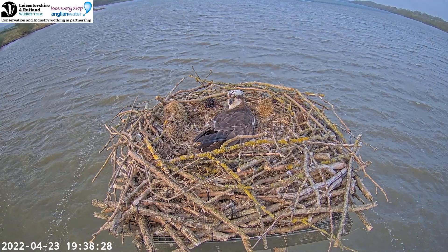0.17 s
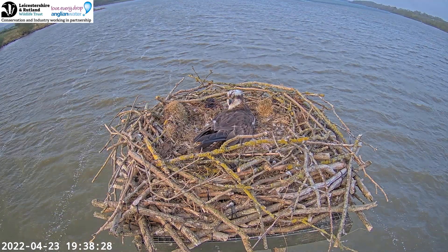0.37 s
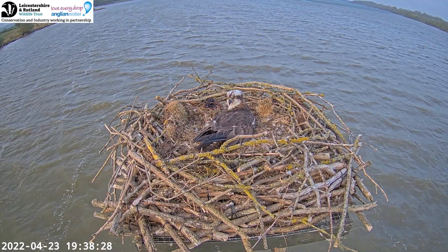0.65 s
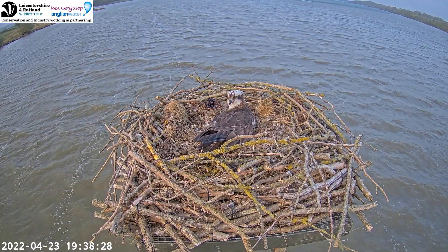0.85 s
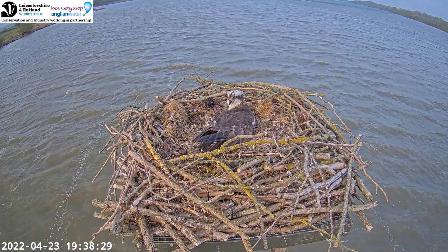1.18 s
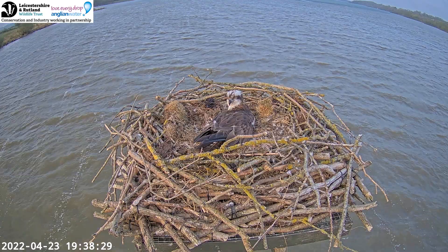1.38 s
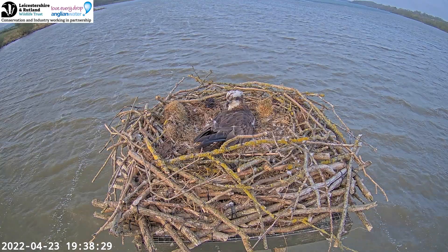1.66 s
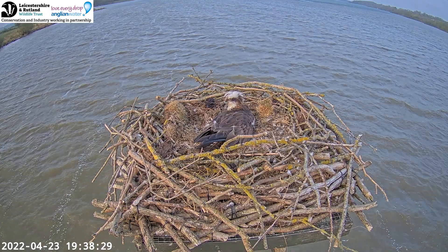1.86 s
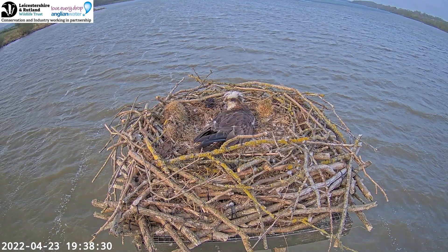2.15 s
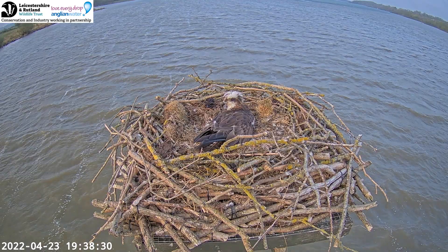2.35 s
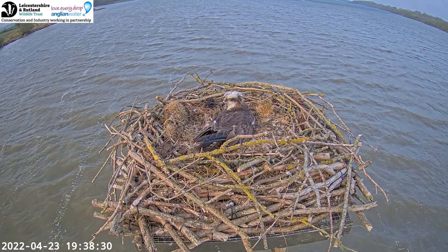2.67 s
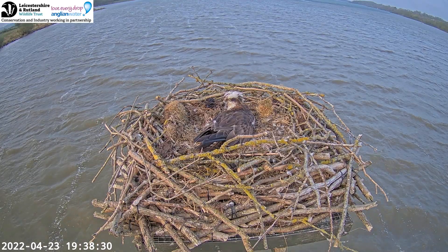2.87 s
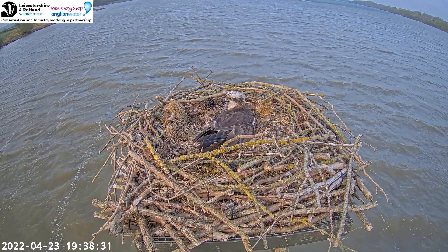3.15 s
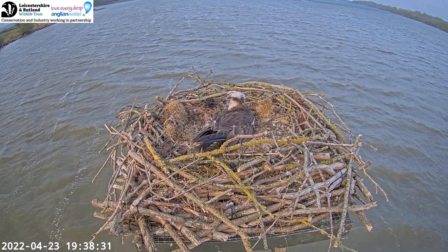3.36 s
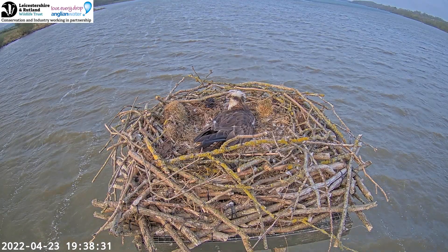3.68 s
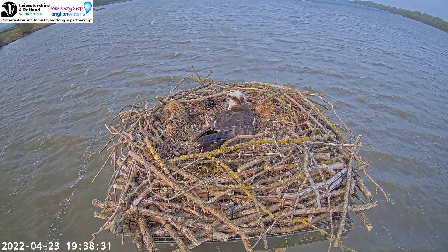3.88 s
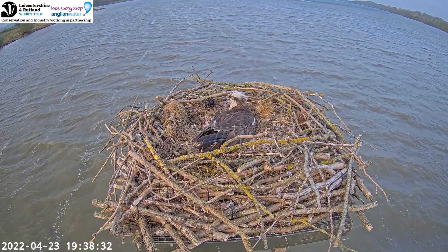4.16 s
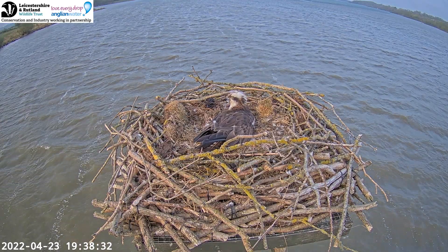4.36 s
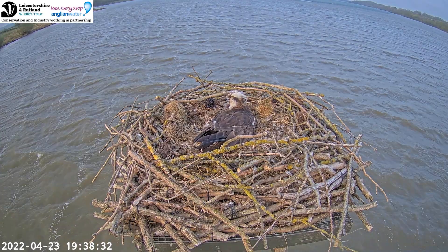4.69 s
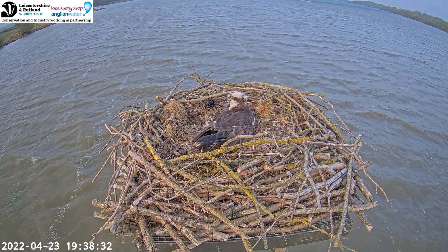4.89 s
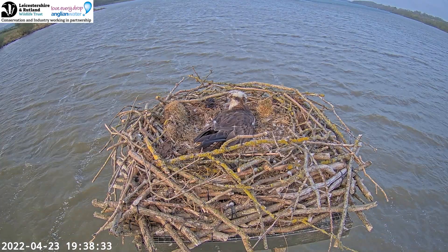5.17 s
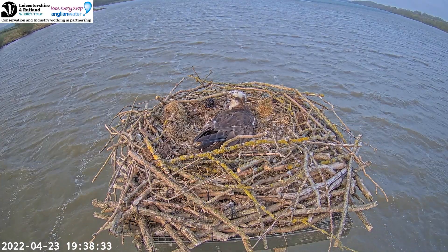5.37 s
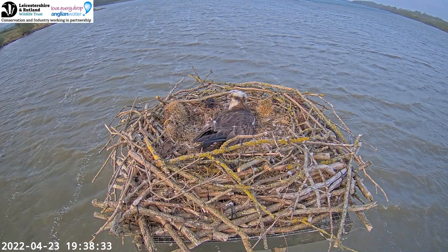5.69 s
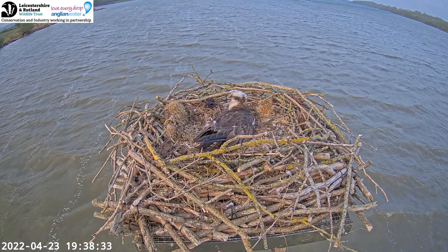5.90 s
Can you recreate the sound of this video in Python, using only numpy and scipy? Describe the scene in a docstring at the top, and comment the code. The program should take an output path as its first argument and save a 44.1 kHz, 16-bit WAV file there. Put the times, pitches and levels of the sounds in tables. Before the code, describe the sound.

An osprey gives two short high whistles, pauses, then calls in a rapid run, over wind rumbling on the microphone and soft water.

```python
"""Two short bird whistles sound over wind and water; after a pause comes a run of fifteen more.
The caller is an osprey on a stick nest above a lake. Each whistle rises, falls and turns hoarse
at its top, where the second side of the syrinx (the bird's voice box) joins in with a higher tone.
Wind buffets the microphone and freshens over the choppy water, whose waves blend into a soft wash."""
import sys
import numpy as np
from scipy import signal
from scipy.fft import rfft, irfft
from scipy.io import wavfile
from scipy.ndimage import uniform_filter1d

SR = 44100
rng = np.random.default_rng(int(sys.argv[2]) if len(sys.argv) > 2 else 0)


def pcm_store(signal):
    """Save signal as 16-bit PCM."""
    levels = np.round(np.clip(np.atleast_2d(signal), -1, 1) * 32767)
    wavfile.write(sys.argv[1], SR, levels.astype(np.int16).T)


N = 266364
TIME = np.arange(N) / SR


def from_db(db):
    """Turn decibels into a volume multiplier."""
    return 10 ** (np.asarray(db) / 20)


def unit_power(x):
    """Scale a signal to an average power of 1."""
    return x / np.sqrt(np.mean(x ** 2) + 1e-20)


def coloured_noise(colour):
    """Steady noise shaped by rows of (frequency_hz, level_db), fading steeply beyond them."""
    hz, db = np.transpose(colour)
    octave, known = np.log2(np.arange(N // 2 + 1) * SR / N + 1e-3), np.log2(hz)
    octaves_beyond = np.abs(octave - np.clip(octave, known[0], known[-1]))
    gain = from_db(np.interp(octave, known, db) - 36 * octaves_beyond)
    return unit_power(irfft(rfft(rng.standard_normal(N)) * gain, N))


def flutter(rate_hz, size=N):
    """Random wavering up to the given rate, about 1 in size."""
    white = rng.standard_normal(max(size, SR // 2) + SR // 4)
    smooth = signal.sosfilt(signal.butter(4, rate_hz, fs=SR, output="sos"), white)
    return unit_power(smooth[SR // 4:])[:size]


def evened(x, span_s):
    """Take the slow swells out of a noise."""
    return x / np.sqrt(uniform_filter1d(x ** 2, int(span_s * SR)) + 0.02)


def gate(t, start, end, attack_s, release_s):
    """Fade in at the start and out at the end."""
    return (1 + np.tanh((t - start) / attack_s)) * (1 + np.tanh((end - t) / release_s)) / 4


def hump(x, centre, half_width, steepness=2):
    """A rounded bump that reaches 1 at its centre."""
    return np.exp(-np.abs((x - centre) / half_width) ** steepness)


# How strongly the wind blows: time_s, level_db
WIND_LEVELS = [(0.03, -55.5), (0.45, -54.5), (0.69, -56), (1.89, -54), (2.17, -54.5), (2.51, -52),
               (2.97, -52.5), (3.25, -52), (4.52, -51), (4.67, -49.5), (4.92, -46), (5.65, -48),
               (6.0, -46.5)]
def wind_strength_db():
    """The wind freshens unevenly as time goes on."""
    return np.interp(TIME, *np.transpose(WIND_LEVELS))


# Brief drops in the wind: time_s, depth_db
WIND_LULLS = [(.76, 7.5), (1.42, 14), (2.11, 5), (3.03, 5), (3.271, 5), (4.37, 5.5)]
def lulls_db(half_length_s=0.051):
    """How far the wind has dropped at each moment."""
    return sum(depth_db * hump(TIME, time_s, half_length_s) for time_s, depth_db in WIND_LULLS)


# Tone colour of the water: frequency_hz, level_db
WAVE_COLOUR = [(150, 7), (450, 1), (520, -2.5), (950, -2.5), (1350, -9.5), (1560, -5.5), (2300, -18),
               (2700, -24.5), (3200, -21), (4900, -36), (5230, -28.5), (5600, -37.5), (6700, -36.5),
               (8000, -54.5)]
def lake(above_wind_db=5, lapping_db=1.06, lull_share=0.18):
    """Countless small waves merge into a soft wash that grows with the wind."""
    level_db = wind_strength_db() + above_wind_db - lull_share * lulls_db() + lapping_db * flutter(47)
    return from_db(level_db) * coloured_noise(WAVE_COLOUR)


# Tone colours of the wind's deep thumps, rumble and hiss: frequency_hz, level_db
THUMP_COLOUR = [(10, 5.5), (18, 0.5), (29, -7.5), (38, -8.5), (46, -22)]
LOW_RUMBLE_COLOUR = [(44, -1), (54, 2.5), (68, -6.5), (100, -9.5), (160, -19.5), (280, -32.5)]
HISS_COLOUR = [(150, 7.5), (1000, -1.5), (2000, -10), (4000, -28.5), (7000, -40.5)]
# Gusts hitting the microphone: time_s, half_length_s, thump_change_db, rumble_change_db, hiss_change_db
WIND_GUSTS = [ (0.369, 0.014, 13.5, 3, 9), (1.01, 0.11, 5.5, 0, 5.5), (1.286, 0.063, 16, 2, 13.5),
              (1.937, 0.05, 11.5, 7, 12), (2.384, 0.025, 3.5, 3, 7), (2.694, 0.044, -3, 4, 8.5),
              (3.151, 0.021, 6.5, 6, 6), (3.52, 0.086, 3, -2, 8), (4.014, 0.032, 12, 3, 10.5),
              (4.176, 0.089, 12.5, 4.5, 5.5), (4.606, 0.088, 5.5, 8, 10), (4.784, 0.059, 14, 5, 13.5),
              (5.973, 0.2, 3.5, 2.5, 6.5)]
def wind_on_microphone(thump_db=-28, rumble_db=-36, hiss_db=-58):
    """Gusts ride on the wind: they thump on the microphone and hiss across its housing."""
    for time_s, half_length_s, thump_change_db, rumble_change_db, hiss_change_db in WIND_GUSTS:
        gust = hump(TIME, time_s, half_length_s)
        thump_db += thump_change_db * gust
        rumble_db += rumble_change_db * gust
        hiss_db += hiss_change_db * gust
    swing_db = wind_strength_db() - wind_strength_db().mean()
    thumps = from_db(thump_db + 0.35 * swing_db) * evened(coloured_noise(THUMP_COLOUR), span_s=0.068)
    eddies_db = flutter(rate_hz=7)
    rumble_db += 0.55 * swing_db - lulls_db() + eddies_db
    rumble = from_db(rumble_db) * evened(coloured_noise(LOW_RUMBLE_COLOUR), span_s=0.11)
    hiss = from_db(hiss_db + 0.5 * swing_db) * coloured_noise(HISS_COLOUR)
    return thumps + rumble + hiss


def nest_echo(voice, echo_db=-30, fade_s=0.16):
    """The nest's sticks and platform add a faint, short echo to the voice."""
    t = TIME[:SR // 2]
    tail = rng.standard_normal(len(t)) * from_db(-60 * t / fade_s) * (t > .003)
    return voice + from_db(echo_db) * signal.fftconvolve(voice, tail / np.linalg.norm(tail))[:N]


# Low squeaks just before the voice breaks upward: start_s, end_s, first_hz, last_hz, level_db
LOW_SQUEAKS = [(4.402, 4.412, 1955, 2034, -32.5), (5.773, 5.784, 1940, 2026, -33)]
def squeaks(octave_db=-7, third_db=-29):
    """Each squeak is a tiny rising tone with a strong overtone an octave up."""
    out = np.zeros(N)
    for start, end, first_hz, last_hz, level_db in LOW_SQUEAKS:
        phase = phase_of(np.interp(TIME, [start, end], [first_hz, last_hz]))
        tone = np.sin(phase) + harmonics(phase, octave_db, third_db)
        out += np.sqrt(2) * from_db(level_db) * tone * gate(TIME, start + .00029, end - .001, .0048, .002)
    return out


def phase_of(pitch_hz):
    """Count up a tone's vibrations as an angle; its sine is the sound."""
    return 2 * np.pi * np.cumsum(pitch_hz) / SR


def harmonics(phase, octave_db, third_db):
    """Overtones at two and three times the pitch."""
    return from_db(octave_db) * np.sin(2 * phase) + from_db(third_db) * np.sin(3 * phase)


# Extra tones in a hoarse voice: pitch_multiple, level_db
HOARSE_TONES = [(3 / 4, -7), (5 / 4, -7), (6 / 4, -9), (7 / 4, -17), (8 / 4, -24), (9 / 4, -19),
                (10 / 4, -19), (11 / 4, -27)]
def ragged_tones(phase):
    """A hoarse voice repeats only every fourth cycle, adding tones that each waver on their own."""
    return sum(from_db(db) * np.sin(multiple * phase + .9 * flutter(150, len(phase)))
               for multiple, db in HOARSE_TONES)


# The moment when one whistle turns reedy: start_s, end_s, level_db
REEDY_MOMENT = (2.95, 3.03, -20)
def reedy_tones(t, phase):
    """Cycles alternate strong and weak, adding tones halfway between the harmonics."""
    start, end, level_db = REEDY_MOMENT
    tones = np.sin(1.5 * phase) + .5 * np.sin(2.5 * phase)
    return from_db(level_db) * gate(t, start, end, .01, .006) * tones


def pitch_arch(progress, first_hz, top_hz, usual_climb_hz=319, end_share=0.835):
    """The pitch rises and falls with the bird's air pressure; wider climbs are straighter."""
    climb_hz, fall_hz = top_hz - first_hz, top_hz * (1 - end_share)
    curve = 1.85 * (usual_climb_hz / max(climb_hz, usual_climb_hz)) ** 0.78  # 1 is straight, 2 is round
    from_top = np.abs(2 * progress - 1)
    return top_hz - np.where(progress < .5, climb_hz * from_top ** curve, fall_hz * from_top ** 2.1)


def upper_voice(progress, arch_hz, gain, upper_db, hoarse_db, wander_hz, full_pitch_hz=3497):
    """The second side sings higher; coupling adds its octave and the sum of both pitches."""
    top_hz = full_pitch_hz + 8 * min(upper_db + 40, 0)  # a weak voice sits a little lower
    phase = phase_of(top_hz * (1 - 0.22 * (progress - .62) ** 2) + wander_hz)
    overtones = np.sin(2 * phase) + from_db(-2) * np.sin(phase_of(arch_hz) + phase)
    overtone_gain = np.sqrt(2) * from_db(hoarse_db - 51) * hump(progress, .48, .31, 6)
    return gain * np.sin(phase) + overtone_gain * overtones


# Tone colour of the hoarse rasp: frequency_hz, level_db
RASP_COLOUR = [(1400, -34), (1900, -3), (2200, -9), (2550, -3.5), (3100, -21), (3800, -15.5), (4400, -26.5),
               (5100, -24), (5600, -46), (6100, -33.5), (6900, -26), (8200, -37)]
# The osprey's whistles: start_s, end_s, first_hz, top_hz, level_db, growth_db, hoarse_db, upper_db
WHISTLES = [ (-.025, .081, 2274, 2740, -33.5, 8, -9.5, -39.5),
            (0.222, .331, 2310, 2685, -33, 3.5, -12, -54.5),
            (2.937, 3.053, 2190, 2746, -34.5, 11.5, -24.5, -68),
            (3.167, 3.252, 2290, 2620, -33.5, 5, -18, -78.5),
            (3.365, 3.452, 2380, 2690, -34, 4.5, -14.5, -68),
            (3.569, 3.658, 2367, 2684, -34.5, 2.5, -14, -56),
            (3.773, 3.865, 2400, 2683, -35, 3, -12.5, -61.5),
            (3.979, 4.073, 2427, 2720, -36.5, 3, -11.5, -49.5),
            (4.187, 4.281, 2450, 2740, -37, 3, -12, -42.5),
            (4.41, 4.496, 2590, 2766, -35.5, 5.5, -12, -42.5),
            (4.619, 4.717, 2450, 2756, -36.5, 2, -12.5, -42.5),
            (4.834, 4.931, 2450, 2760, -35.5, 2.5, -13, -41),
            (5.079, 5.178, 2336, 2756, -34, 6.5, -13, -49),
            (5.332, 5.441, 2417, 2760, -34, 4.5, -14.5, -50),
            (5.554, 5.659, 2436, 2775, -35, 4.5, -12, -38.5),
            (5.784, 5.871, 2640, 2780, -34, 4.5, -12, -42),
            (6.030, 6.14, 2470, 2840, -32.5, 11.5, 1.5, -47)]
def whistles(jitter_hz=190, crack_jitter_hz=1400, crack_drop_hz=600, sag_db=-2, rasp_db=-2.5):
    """Two membranes sound together: the lower draws the arch, the upper fights it at full pressure."""
    out = np.zeros(N)
    jitter, tremble, wander, upper_tremble = flutter(300), flutter(370), flutter(200), flutter(110)
    rasp = from_db(rasp_db) * coloured_noise(RASP_COLOUR)
    for start, end, first_hz, top_hz, level_db, growth_db, hoarse_db, upper_db in WHISTLES:
        span = slice(max(0, int((start - .02) * SR)), int((end + .02) * SR))
        t = TIME[span]
        progress = np.clip((t - start) / (end - start), 0, 1)
        level, hoarseness = from_db(level_db), from_db(hoarse_db)
        pressure = hump(progress, .46, .37, 6.8)
        roughness = hoarseness * pressure
        upper_gain = from_db(upper_db) * hump(progress, .55, .19, 3)
        rivalry = upper_gain / level  # the lower voice yields as the upper one takes the air

        # at the top of a hoarse note the pitch shakes and slips
        arch_hz = pitch_arch(progress, first_hz, top_hz)
        crack = hoarseness ** 2 * hump(progress, .56, .11, 2.3)
        crack_hz = crack * (crack_jitter_hz * jitter[span] - crack_drop_hz)
        phase = phase_of(arch_hz + jitter_hz * (roughness + .048) * jitter[span] + crack_hz)
        # a hoarse note starts with a kick and dips in the middle
        strain_db = hoarseness * (8 * hump(progress, 0, .08, 3.7) - 18 * hump(progress, .6, .12, 1.6))
        shape_db = strain_db + sag_db * pressure + growth_db * (progress - 1)
        lower_gain = level * from_db(shape_db) / (1 + 1.1 * rivalry)
        lower = (1 + roughness * tremble[span]) * np.sin(phase)
        reedy = (1 + .32 * tremble[span]) * reedy_tones(t, phase)
        # plain overtones show only where the voice is calm
        calm = (1 - pressure) * np.exp(-2.2 * hoarseness) * (1 + .5 * tremble[span])
        overtones = level * calm * harmonics(phase, octave_db=-29, third_db=-36)
        upper = upper_voice(progress, arch_hz, upper_gain, upper_db, hoarse_db, 24 * wander[span])
        tones = lower_gain * (lower + reedy) + overtones + upper * (1 + .29 * upper_tremble[span])
        hoarse = level * (roughness + .025) * (rasp[span] + ragged_tones(phase) / (1 + 4 * rivalry))
        out[span] += (np.sqrt(2) * tones + hoarse) * gate(t, start + .00027, end - .003, .0013, .0032)
    return out


def scene():
    """Bird and nest close by, with wind and water, in one channel."""
    return (nest_echo(whistles() + squeaks()) + wind_on_microphone() + lake())[None]


def record(dry, cutoff_hz=8400):
    """A small outdoor microphone misses the highest treble."""
    return signal.sosfilt(signal.ellip(10, .2, 80, cutoff_hz, fs=SR, output="sos"), dry)


dry = scene()
out = record(dry)
pcm_store(out)
```